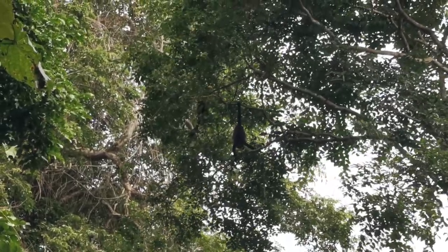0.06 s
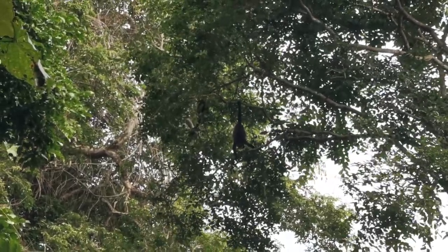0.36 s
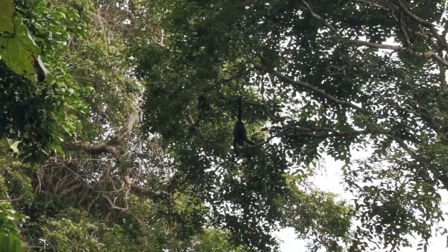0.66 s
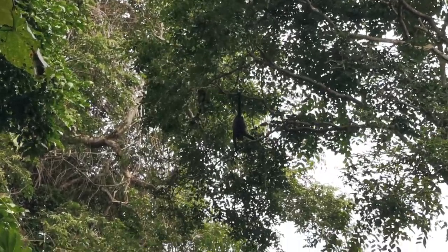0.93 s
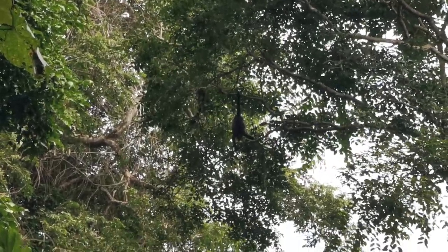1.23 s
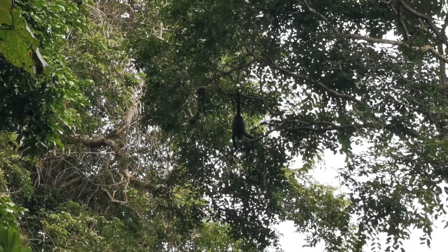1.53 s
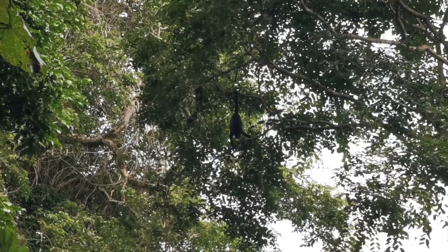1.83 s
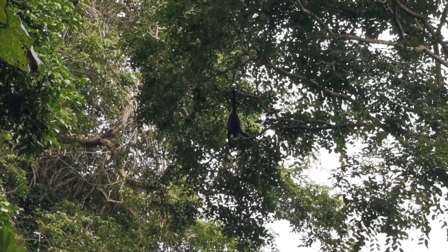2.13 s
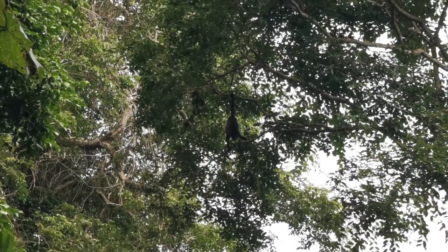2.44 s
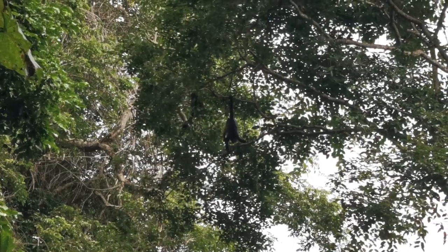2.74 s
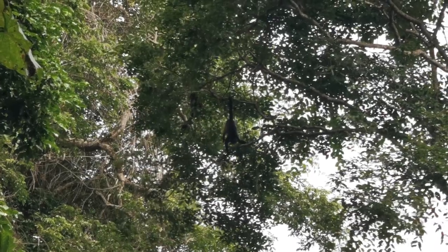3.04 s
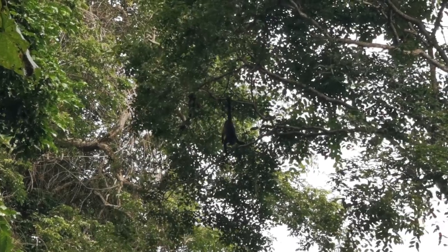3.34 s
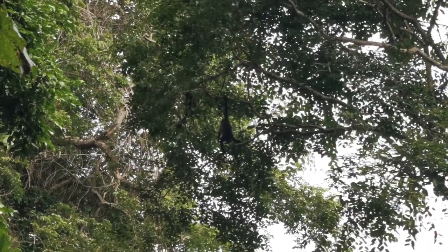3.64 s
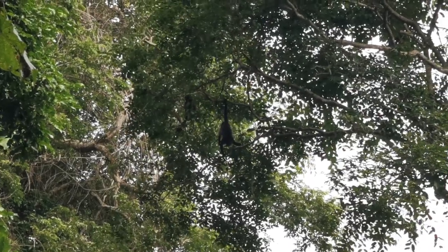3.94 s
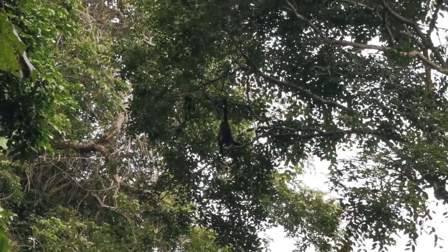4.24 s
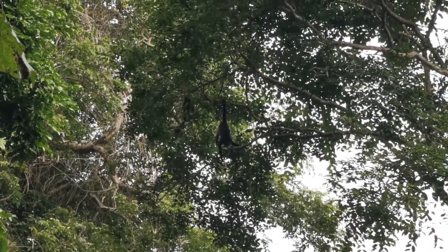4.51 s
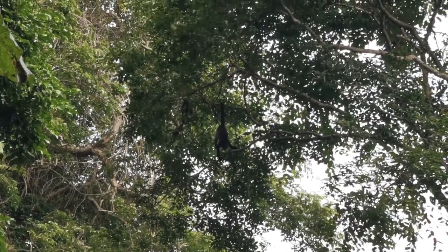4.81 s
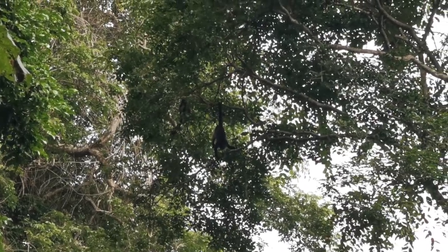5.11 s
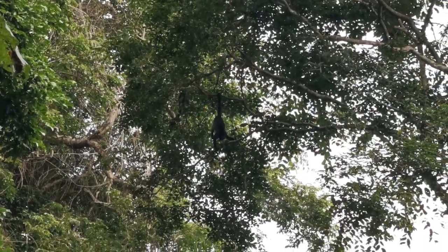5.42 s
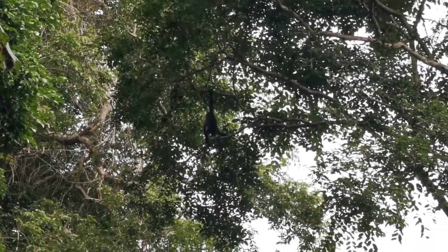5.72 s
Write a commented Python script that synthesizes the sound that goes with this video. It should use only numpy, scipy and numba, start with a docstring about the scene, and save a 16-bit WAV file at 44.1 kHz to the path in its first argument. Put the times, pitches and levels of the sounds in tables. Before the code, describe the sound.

In a still forest, a howler monkey keeps up an even series of short, rough, hooting grunts, blurred by echo from the trunks and canopy. High insects shimmer on the right the whole time, with a nearer one making a thin, rapid ticking buzz. A twig snaps at the start and again midway, and the microphone takes a couple of soft, dull knocks.

```python
"""Forest floor: a howler monkey high in a tree grunts about twice a second.
Each grunt is a rough vocal-fold rattle through the throat resonances, plus a hoot from the hollow
hyoid bone; trunks and canopy echo it. Close on the right an insect ticks at about 42 strokes/s.
Behind: a shrill insect chorus, still air, a few twig snaps and dull microphone bumps."""
import sys
import numpy as np
from scipy import signal
from scipy.fft import rfft, irfft, next_fast_len
from scipy.io import wavfile
from scipy.ndimage import uniform_filter1d
from numba import njit

SR = 44100
rng = np.random.default_rng(int(sys.argv[2]) if len(sys.argv) > 2 else 0)


def generate_wav(signal):
    """Clip the signal to [-1, 1] and save it as 16-bit WAV at the path in sys.argv[1]."""
    frames = np.transpose(np.atleast_2d(signal))
    scaled = np.clip(frames, -1, 1) * 32767
    pcm = np.round(scaled).astype(np.int16)
    wavfile.write(sys.argv[1], SR, pcm)


N = 254456
TIME = np.arange(N) / SR

# still-air spectrum before further shaping: f/Hz, left/dB, right/dB
AIR_SPECTRUM = [(30.5, -73.5, -73.5), (52, -75, -80.5), (101, -87, -85), (189.5, -80.5, -82.5),
                (304, -89.5, -88.5), (460, -99, -98), (900, -101, -100), (1740, -105, -106),
                (2650, -92, -106), (3120, -101, -103), (4170, -95, -107), (4770, -92.5, -102),
                (5740, -105, -104)]
# swell of the air's rumble: t/s, gain/dB
RUMBLE_GAIN = [(0, 5), (1.2, -3.5), (4.8, -3.5), (5.3, 2), (5.77, 0)]
# microphone bumps: t/s, level/dB, half-width/s
MIC_BUMPS = [(2.437, -37, .005), (4.417, -43, .004), (5.1, -53, .008)]
# twig snaps: t/s, level before filtering/dB
TWIG_SNAPS = [(0.2048, -40.5), (2.724, -48.5), (5.1, -55)]
# insect chorus, spectral density: f/Hz, left/dB, right/dB
CHORUS_SPECTRUM = [(6580, -120, -118), (6550, -106, -97), (7154, -86.5, -77), (7380, -92, -79),
                   (8090, -104, -73), (7860, -81, -86), (8730, -105, -83), (10020, -102, -76.5),
                   (12460, -112, -100), (14400, -126, -126)]
# near insect, click filter: f/Hz, gain/dB
TICK_SPECTRUM = [(6500, -31), (8300, -15), (9100, -4), (9700, 1), (10050, -0.5), (10450, 4), (10930, 1),
                 (11250, -8), (12000, -17.5), (13000, -34), (13400, -55)]
# near insect, stroke rate: t/s, rate/Hz
STROKE_RATE = [(0, 41.62), (2.8, 41.65), (5.5, 42.1)]
# throat resonances, mouth open: f/Hz, width/Hz, level/dB, loss when shut/dB, left minus right/dB
THROAT_MODES = [(271, 77, -20, 0, -1), (528, 112.5, -8.5, 6, -3.5), (637, 131, -13.5, 0.5, -5),
                (921, 53.4, 1, 3.5, -0.5), (1126, 150, -26.5, 10, -7.5), (1426, 61, -15.5, 6.5, 0.5),
                (2027, 78, -25.5, 14, 0.5), (3382, 75, -15.5, 20, 19.5), (3570, 223, -12.5, 6, 7),
                (4146, 127, -27.5, 29, -15), (5286, 227, -19, 1, 2), (5728, 96, -16.5, 7, -10)]
# grunts: peak t/s, length/s, level/dB, hoot level/dB, tuning ratio, hoot sag one length on/Hz
GRUNT_EVENTS = [(0.134, 0.14, -40, -44.5, 0.99, 21.5), (0.593, 0.16, -41.5, -46, 0.99, 38),
                (1.071, 0.15, -42.5, -48, 0.98, 73), (1.531, 0.14, -45, -46, 0.98, 56),
                (1.962, 0.15, -44.5, -46.5, 0.98, 41), (2.406, 0.14, -42, -45, 0.99, 59),
                (2.887, 0.15, -41, -47, 1.006, 55), (3.333, 0.17, -44, -49.5, 1.001, 61),
                (3.815, 0.132, -44, -45.5, 1.003, 45.4), (4.267, 0.16, -44, -46.5, 0.99, 27),
                (4.749, 0.15, -43.5, -49.5, 0.99, 46), (5.221, 0.15, -44.5, -43.5, 1.0, 24.5),
                (5.694, 0.13, -43, -45, 1.0, 24)]


def undb(db):
    """Decibels to gain."""
    return 10 ** (np.asarray(db) / 20)


def unit(x):
    """Scale to rms 1."""
    return x / np.sqrt(np.mean(x ** 2))


def pan(left_minus_right_db):
    """Left and right gains."""
    return undb(np.array([[1], [-1]]) * left_minus_right_db / 2)


def colour(x, hz, db):
    """Filter by a gain curve, interpolated over log frequency."""
    size = next_fast_len(x.shape[-1], real=True)
    bins_hz = np.fft.rfftfreq(size, 1 / SR)
    gain = undb(np.interp(np.log(bins_hz + 1), np.log(hz), db))
    return irfft(rfft(x, size) * gain, size)[..., :x.shape[-1]]


@njit
def band(x, hz, width_hz):
    """State-variable band-pass, moving centre."""
    y, band_state, low_state = np.empty(len(x)), 0., 0.
    for i in range(len(x)):
        g, damping = np.tan(np.pi * hz[i] / SR), width_hz[i] / hz[i]
        v = (band_state + g * (x[i] - low_state)) / (1 + g * (g + damping))
        band_state = 2 * v - band_state
        low_state += 2 * g * v
        y[i] = damping * v
    return y


def resonate(x, hz, width_hz):
    """Steep resonance: three band-passes in series, unity gain at centre."""
    for _ in range(3):
        x = band(x, hz + np.zeros(len(x)), np.full(len(x), 2. * width_hz))
    return x


def walk(rate_hz, size=N):
    """Smooth random drift, spread near 1."""
    hold = max(int(SR / rate_hz), 1)
    steps = np.repeat(rng.standard_normal(size // hold + 3), hold)
    return 1.3 * uniform_filter1d(uniform_filter1d(steps, hold), hold)[hold:hold + size]


def swell_db(progress, start, hold, attack, release):
    """Envelope: 0 dB from start through hold; attack and release each span 30 dB."""
    early = np.maximum(start - progress, 0)
    late = np.maximum(progress - start - hold, 0)
    return -30 * (early / attack + late / release)


def bed(spectrum, noise):
    """Shape stereo noise by left and right spectral densities."""
    hz, *sides_db = np.transpose(spectrum)
    return np.array([colour(side, hz, db) for side, db in zip(noise, sides_db)]) * np.sqrt(SR / 2)


def air():
    """Still air: swelling rumble, alike on both sides, under faint hiss."""
    common = colour(rng.standard_normal(N), [700, 2500], [0, -14]) * undb(2.6 * walk(4.3))
    diffuse = colour(rng.standard_normal((2, N)), [700, 2500], [-6, 0])
    still = colour(bed(AIR_SPECTRUM, common + diffuse), [5550, 6400, 8900, 14000], [-1, -1.5, -4, -31])
    rumble = colour(still, [70, 150], [0, -40])
    rumble_gain = undb(np.interp(TIME, *np.transpose(RUMBLE_GAIN)))
    return still + rumble * (rumble_gain - 1)


def bumps(thud_hz=140):
    """Soft knocks on the microphone: Gaussian tone pulses."""
    out = np.zeros(N)
    for at_s, db, width_s in MIC_BUMPS:
        t = TIME - at_s
        out += undb(db) * np.exp(-(t / width_s) ** 2) * np.cos(2 * np.pi * thud_hz * t)
    return out * pan(3)


def twigs(decay_s=0.0019):
    """Twigs snap: short, dry noise bursts."""
    envelope = sum(undb(db) * (TIME > at_s) * np.exp(-abs(TIME - at_s) / decay_s)
                   for at_s, db in TWIG_SNAPS)
    bursts = envelope * rng.standard_normal(N)
    return colour(bursts, [900, 2500, 4500, 7000, 12000], [-26.5, -1, 3, -25, -37]) * pan(6)


def chorus(singer_stop_s=2.53, singer_db=-59, whine_db=-64):
    """Far insects shimmer; one shrill singer stops partway, another holds a thin whine."""
    crowd = bed(CHORUS_SPECTRUM, rng.standard_normal((2, N))) * undb(0.65 * walk(45))
    singer = unit(resonate(rng.standard_normal(N), hz=8136, width_hz=135)) * undb(1.53 * walk(60.5))
    singer *= np.clip((singer_stop_s - TIME) / 0.024, 0, 1)
    whine = unit(resonate(rng.standard_normal(N), hz=9850, width_hz=14))
    return crowd + (singer * undb(singer_db) + whine * undb(whine_db)) * pan(-20)


def near_insect(click_hz=10000, click_s=0.00007, pair_gap_s=0.008018,
                leaf_echo_s=0.0012, scatter_s=0.03, direct_db=-60.5, scattered_db=-55.1):
    """Two clicks per stroke, heard direct and scattered by leaves."""
    stroke_hz = np.interp(TIME, *np.transpose(STROKE_RATE)) * (1 + 0.0013 * walk(40))
    since_click_s = (np.cumsum(stroke_hz) / SR % 1) / stroke_hz - 0.004
    clicks = sum(np.exp(-(t / click_s) ** 2) * np.cos(2 * np.pi * click_hz * t)
                 for t in (since_click_s, since_click_s - pair_gap_s))
    clicks = colour(clicks * undb(0.5 * walk(60)), *np.transpose(TICK_SPECTRUM))
    tail_s = TIME[:SR // 5]
    leaves = rng.standard_normal((2, len(tail_s))) * np.exp(-tail_s / scatter_s)
    scattered = unit(signal.fftconvolve(clicks[None], leaves, axes=1)[:, :N])
    direct = unit(clicks + 0.4 * np.roll(clicks, int(leaf_echo_s * SR)))
    return undb(direct_db) * direct * pan(-27) + undb(scattered_db) * scattered * pan(-21)


def scatter(envelope, db, spread):
    """Dense stereo echoes under a 1 s envelope; spread decorrelates the sides."""
    noise = rng.standard_normal(SR) + spread * rng.standard_normal((2, SR))
    return undb(db) * unit(noise * envelope) / np.sqrt(SR)


def forest(call, low_t60_s=0.95, high_t60_s=0.6, crossover_hz=(1100, 1800),
           tree_echo_s=0.0993, right_lag_samples=7):
    """Leaves smear the call, the forest rings on, a wall of trees returns one blurred echo."""
    t = TIME[:SR]
    onset = 1 - np.exp(-t / 0.035)
    lows = scatter(undb(-60 * t / low_t60_s) * onset, db=-7.5, spread=0.49)
    highs = scatter(undb(-60 * t / high_t60_s) * onset, db=-4, spread=8.8)
    leaves = scatter(np.exp(-t / 0.016), db=-4, spread=0.47)
    trees = scatter(np.exp(-((t - tree_echo_s) / 0.01) ** 2), db=-12, spread=0.38)
    reverb = colour(lows, crossover_hz, [0, -30]) + colour(highs, crossover_hz, [-30, 0])
    left, right = call + signal.fftconvolve(call, reverb + leaves + trees, axes=1)[:, :N]
    return np.array([left, np.roll(right, right_lag_samples)])


def rattle(size, fold_hz=120, jitter=0.3, flutter_hz=55, flutter_depth=0.22):
    """Slack vocal folds slap chaotically, a turbulent puff per slap; the throat flutters more slowly."""
    fold_cycles = np.cumsum(fold_hz * np.exp(jitter * walk(110, size))) / SR
    slaps = np.diff(np.floor(fold_cycles), prepend=0)
    puffs = np.exp(-(fold_cycles % 1)) * rng.standard_normal(size)
    flutter_cycles = np.cumsum(flutter_hz * np.exp(0.22 * walk(40.1, size))) / SR
    flutter = 1 + flutter_depth * np.sin(2 * np.pi * flutter_cycles)
    return unit((unit(slaps) + 1.2 * unit(puffs)) * flutter)


def throat(folds, progress, level_db, tuning, mouth_glide=0.075, easy_db=-44,
           twang_hz=2005, twang_per_db=2.5, rasp_above_hz=2600, rasp_per_db=-0.1):
    """One push of air rings the throat, higher as the mouth opens; louder adds nasal twang."""
    effort_db = level_db - easy_db
    body_db = level_db + swell_db(progress, start=-0.24, hold=0.34, attack=0.56, release=1)
    # rasp peaks first, dulls as the air runs out
    rasp_db = level_db + swell_db(progress, start=-0.35, hold=0.38, attack=0.33, release=0.91)
    rasp_db += rasp_per_db * effort_db
    mouth_shut = 1 - np.exp(-((progress - 0.0031) / 0.59) ** 2)
    voice = 0
    for hz, width_hz, mode_db, shut_loss_db, pan_db in THROAT_MODES:
        # the jaw moves low resonances most
        octaves_up = max(np.log2(hz / 920), 0)
        centre_hz = hz * tuning * (1 - mouth_glide * mouth_shut / (1 + octaves_up / 4))
        ring = unit(resonate(folds, centre_hz, width_hz)) * np.sqrt(width_hz / 100)
        drive_db = rasp_db if hz > rasp_above_hz else body_db
        twang_db = twang_per_db * effort_db * np.exp(-((hz - twang_hz) / 300) ** 2)
        voice += ring * undb(mode_db + drive_db + twang_db - shut_loss_db * mouth_shut) * pan(pan_db)
    return voice


def hoot(folds, progress, level_db, tuning, sag_hz, hyoid_hz=391):
    """The hyoid chamber hoots: later and longer than the push, wavering, sinking as pressure falls."""
    size = len(folds)
    pitch_hz = hyoid_hz * tuning - sag_hz * np.maximum(progress, 0) ** 2 + 5 * walk(89, size)
    tone = np.sin(2 * np.pi * np.cumsum(pitch_hz) / SR) * undb(3.8 * walk(54.5, size))
    hoarse = unit(resonate(folds, pitch_hz, width_hz=56))
    envelope = undb(level_db + swell_db(progress, start=-0.18, hold=0.67, attack=0.61, release=1))
    return (0.79 * tone + 0.34 * hoarse) * envelope * pan(-0.68)


def monkey():
    """Grunt series: each fold rattle drives throat and hyoid."""
    out = np.zeros((2, N))
    for peak_s, length_s, level_db, hoot_db, tuning, sag_hz in GRUNT_EVENTS:
        span = (TIME > peak_s - length_s) & (TIME < peak_s + 1.5 * length_s)
        progress = (TIME[span] - peak_s) / length_s  # grunt lengths from the peak
        folds = rattle(len(progress))
        out[:, span] += throat(folds, progress, level_db, tuning)
        out[:, span] += hoot(folds, progress, hoot_db, tuning, sag_hz)
    return out


def scene():
    """Stereo mix: monkey in the forest, insects, background."""
    return forest(monkey()) + near_insect() + chorus() + air() + bumps() + twigs()


def record(dry, cutoff_hz=15000):
    """Steep elliptic low-pass."""
    return signal.sosfilt(signal.ellip(8, 0.2, 70, cutoff_hz, fs=SR, output="sos"), dry)


dry = scene()
out = record(dry)
generate_wav(out)
```